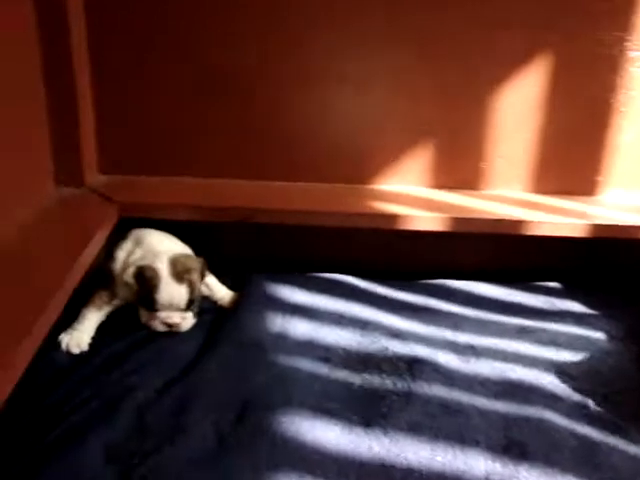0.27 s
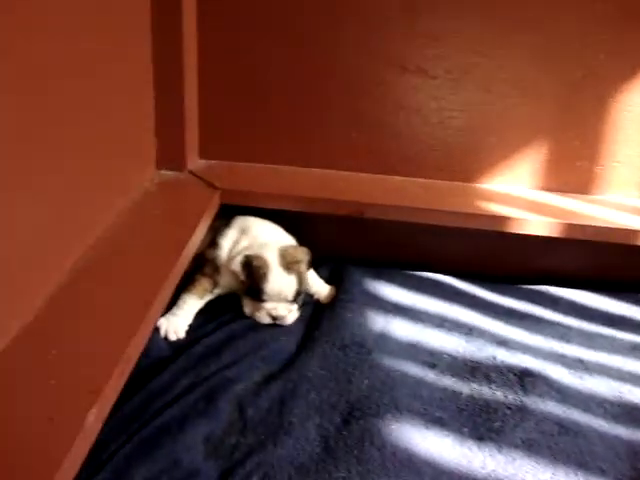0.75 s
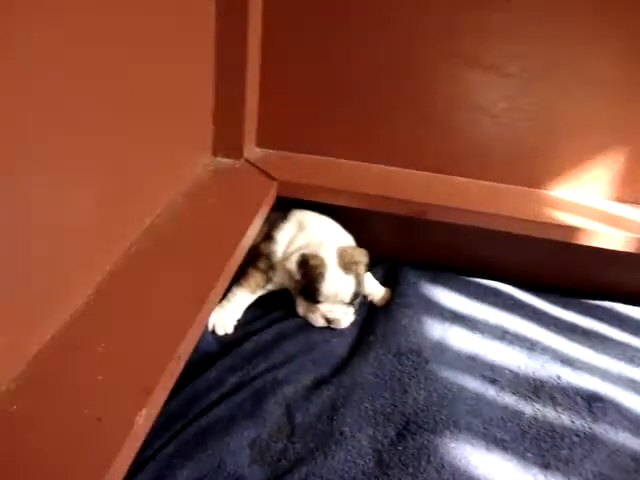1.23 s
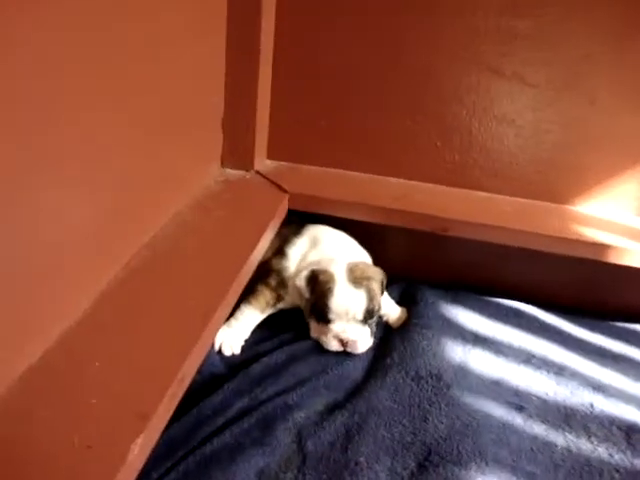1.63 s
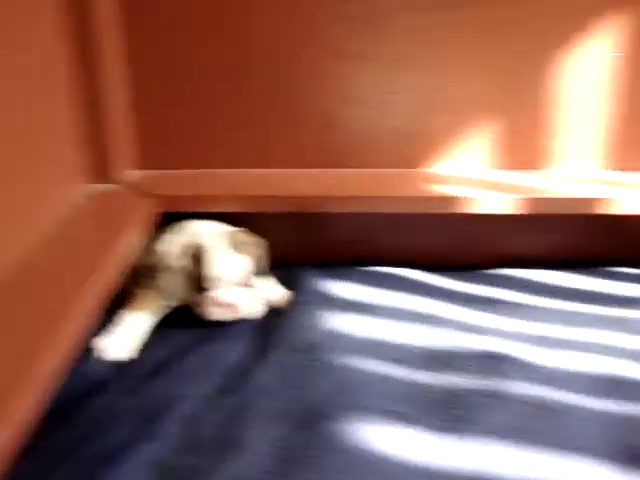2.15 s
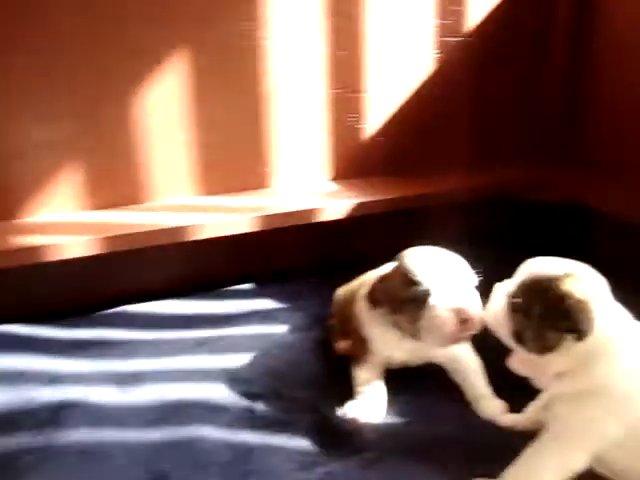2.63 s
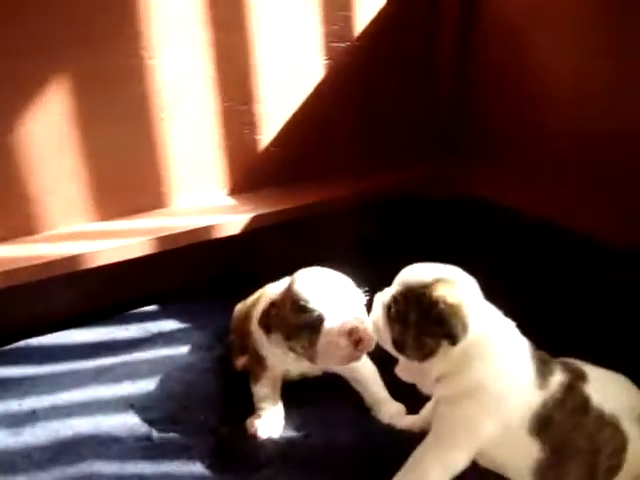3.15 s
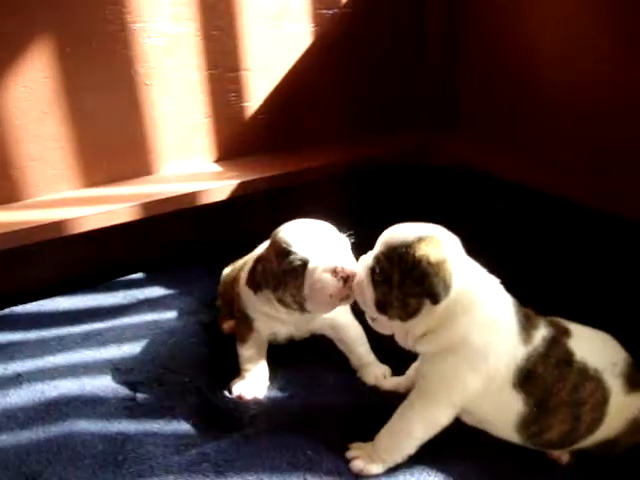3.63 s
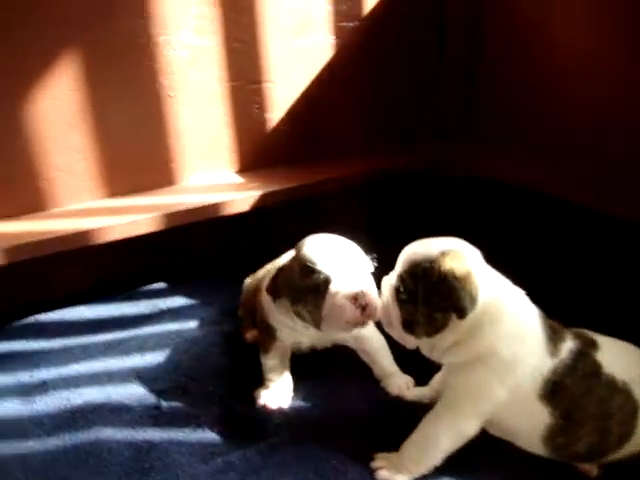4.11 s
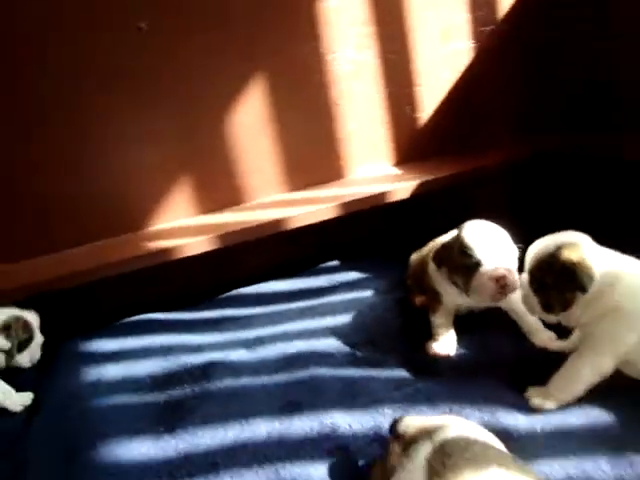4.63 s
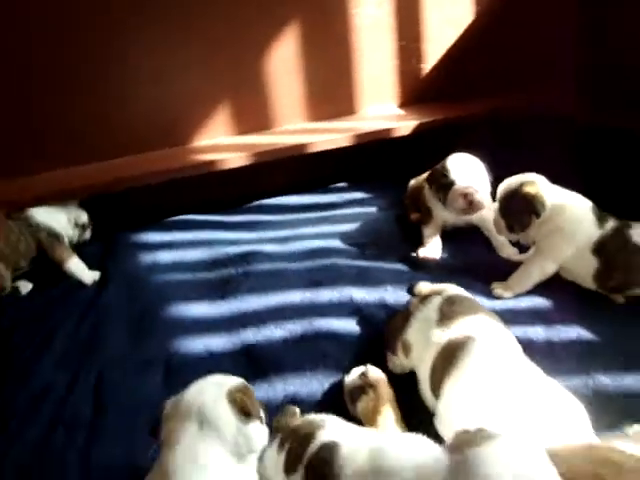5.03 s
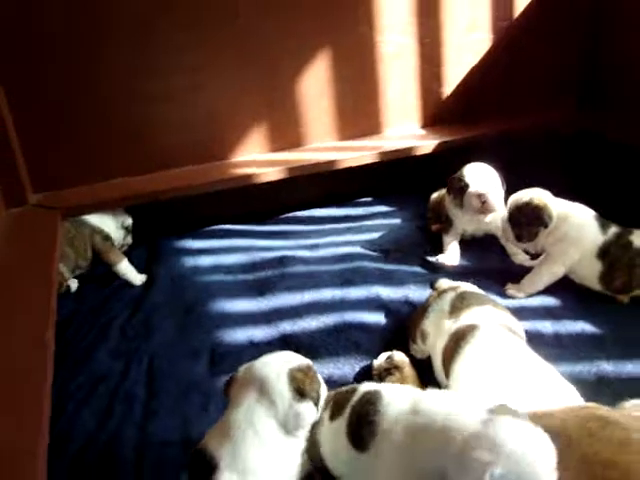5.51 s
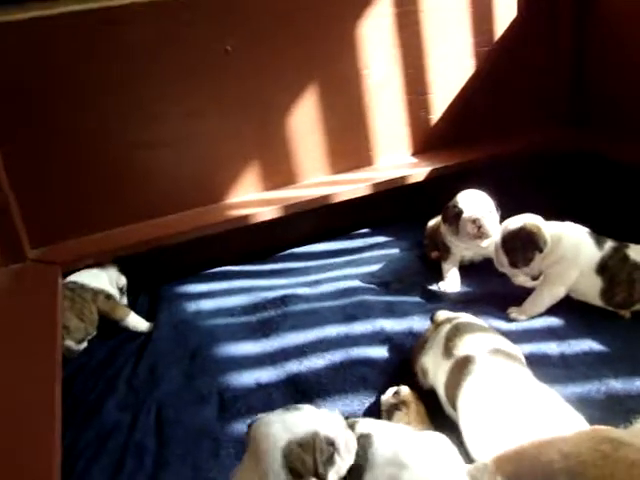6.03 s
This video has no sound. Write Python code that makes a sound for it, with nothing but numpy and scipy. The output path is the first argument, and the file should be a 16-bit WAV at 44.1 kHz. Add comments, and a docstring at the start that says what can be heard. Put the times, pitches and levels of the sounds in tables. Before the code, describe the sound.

A very young puppy gives two runs of thin, high, whistle-like squeals in a quiet wooden box, with snuffles, soft paw thumps and blanket rustles.

```python
"""A quiet room with a wooden whelping box, heard from just above: steady air noise, faint hum, hiss, rumble.
Claws scratch the boards (skidding noise grains), then a very young puppy starts a run of nearly pure cries,
sine stacks with weak overtones; the loudest breaks into a rasp, and grainy snuffles fall between cries.
After a pause paws land with soft thumps (short low sines) and a second, shorter run begins.
Ticks (damped resonances) and blanket rustles (dull grains) come throughout and outlast the cries."""
import sys
import numpy as np
from scipy import signal
from scipy.fft import rfft, next_fast_len
from scipy.io import wavfile
from scipy.ndimage import uniform_filter1d, minimum_filter1d, map_coordinates

SR = 44100
rng = np.random.default_rng(int(sys.argv[2]) if len(sys.argv) > 2 else 0)


def digitize_waveform(pressure):
    """Quantize a signal to 16-bit integers and store it at the path in sys.argv[1].

    Rows of a 2-D input are taken as channels; values are limited to [-1, 1].
    """
    field = np.atleast_2d(pressure).T
    bounded = np.clip(field, -1, 1)
    quanta = np.round(bounded * 32767).astype(np.int16)
    wavfile.write(sys.argv[1], SR, quanta)


N = 276057
TIME = np.arange(N) / SR   # [s]
CUTOFF_HZ = 10150   # top of the noises and of the recorder


def from_db(db):
    """Decibels to gain."""
    return 10 ** (np.asarray(db) / 20)


def rms_one(x):
    """Scale to unit rms."""
    return x / np.sqrt(np.mean(x ** 2) + 1e-20)


def at_hz(points, hz):
    """Read a spectrum in dB on a log-frequency axis."""
    f, db = np.transpose(points)
    return np.interp(np.log(np.maximum(hz, 1)), np.log(f), db)


def coloured(x, spectrum, tilt_db=0):
    """Give a noise a spectrum, tilted in dB per octave and empty above the cutoff; rms 1."""
    hz = np.maximum(np.fft.rfftfreq(len(x), 1 / SR), 1)
    gain = from_db(at_hz(spectrum, hz) + tilt_db * np.log2(hz)) * (hz < CUTOFF_HZ)
    return rms_one(np.fft.irfft(rfft(x) * gain, len(x)))


def drift(rate, size):
    """Smooth random wander of spread about 1, drawn through 2 * rate random knots per second."""
    knots = rng.standard_normal(size // 16 + 4)
    position = np.arange(size) * min(2 * rate / SR, 1 / 16)
    return map_coordinates(knots, [position], order=2, mode="mirror")


def grains(size, per_s, smooth):
    """Random clicks of uneven size over a share of smooth noise."""
    clicks = (rng.random(size) < per_s / SR) * rng.standard_normal(size)
    return rms_one(clicks) + smooth * rng.standard_normal(size)


def add(out, s, sound):
    """Mix a sound in at a given time."""
    at = max(int(s * SR), 0)
    out[at:at + len(sound)] += sound[:max(N - at, 0)]


def swell(size):
    """A rounded rise and fall of rms 1."""
    return np.sqrt(signal.windows.hann(size) * 2)


def grain_bursts(rows, spectrum, per_s, smooth):
    """Each row (time, length, level, optional tilt) is one swelling burst of coloured grains."""
    out = np.zeros(N)
    for s, length, db, *tilt_db in rows:
        size = int(length * SR)
        burst = coloured(grains(size, per_s, smooth), spectrum, *tilt_db)
        add(out, s, from_db(db) * swell(size) * burst)
    return out


def bed(spectrum, swells, floor_db):
    """Smooth noise over a steady floor, with swells where rows are given."""
    level = np.zeros(N)
    for s, length, db in swells:
        add(level, s, from_db(db) * swell(int(length * SR)))
    noise = coloured(rng.standard_normal(next_fast_len(N)), spectrum)[:N]
    return noise * np.hypot(level, from_db(floor_db))


def room_air():
    """Steady room noise: random air pressure with a fixed spectrum."""
    # spectrum of the room noise: (frequency [Hz], relative level [dB])
    air_colour = [(15, -55.5), (25, -20.5), (172, -8), (205, -16.5), (233, -2.5), (348, -1.5), (425, -1),
                  (458, 0), (506, -1), (795, -4), (972, -1.5), (1310, -7.5), (1420, -4.5), (1730, -7.5),
                  (10000, -19), (13000, -63), (22000, -120)]
    return bed(air_colour, [], floor_db=-53)


def household_hum():
    """Faint steady tones whose phase wavers slowly."""
    # hum tones: (frequency [Hz], level [dB rms])
    tones = [(172, -77), (234, -71.5)]
    out = np.zeros(N)
    for hz, db in tones:
        out += np.sqrt(2) * from_db(db) * np.sin(2 * np.pi * hz * TIME + drift(5.1, N))
    return out


def high_hiss():
    """A thin high noise band comes and goes over a faint floor."""
    # swells of the hiss: (time [s], length [s], level [dB])
    hiss_swells = [(0.37, 0.26, -61), (0.64, 0.54, -65), (2.611, 0.42, -54), (3.295, 0.079, -64),
                   (4.373, .11, -62), (4.76, 0.52, -54.5)]
    # spectrum of the hiss: (frequency [Hz], relative level [dB])
    hiss_colour = [(4500, -26), (6000, -10), (7200, -5), (8200, -16), (10000, -29)]
    return bed(hiss_colour, hiss_swells, floor_db=-73)


def box_rumble():
    """The box rumbles softly in a low noise band as the litter shifts."""
    # swells of the rumble: (time [s], length [s], level [dB])
    rumble_swells = [(1.463, 0.098, -63), (1.794, 0.17, -57.5), (2.201, 0.2, -55.5), (4.25, .14, -59),
                     (4.63, 0.1, -64), (5.922, 0.37, -67)]
    # spectrum of the rumble: (frequency [Hz], relative level [dB])
    rumble_colour = [(40, -32), (100, -23.5), (160, -5), (210, -4), (260, -4.5), (400, -8.5), (1000, -44)]
    return bed(rumble_colour, rumble_swells, floor_db=-67)


def reflections(x, spectrum, t60, build_s):
    """Dense reflections that build up and die away, modelled as decaying coloured noise."""
    t = TIME[:SR * 3 // 4]
    envelope = from_db(-60 * t / t60) * (1 - np.exp(-t / build_s))
    tail = coloured(rng.standard_normal(len(t)), spectrum) * envelope
    return signal.fftconvolve(x, tail / np.linalg.norm(tail))[:N]


def room(x):
    """Direct sound, quick scatter in the box, a few distinct echoes and the tail of the room."""
    # scatter inside the box: (frequency [Hz], relative level [dB])
    box_colour = [(150, -20), (2000, 3.5), (4000, 0), (6000, 4), (10000, 0.5)]
    # tail of the room: (frequency [Hz], relative level [dB])
    room_colour = [(150, 4.5), (1200, -7), (2000, -2), (3400, 2), (5000, -2.5), (7200, 2.5), (10000, -9.5)]
    # echoes off the box and the nearest walls: (delay [s], level [dB])
    echoes = [(.0047, -35.5), (0.0128, -22), (.031, -21.5), (.052, -33.5)]
    out = x + from_db(-9) * reflections(x, box_colour, t60=.08, build_s=.002)
    out += from_db(-16) * reflections(x, room_colour, t60=.56, build_s=.015)
    for delay, db in echoes:
        out += from_db(db) * np.interp(TIME - delay, TIME, x)
    return out


def dips(x):
    """The fundamental's band fades as if a cry and its echoes cancelled; the overtones carry on."""
    # brief fades: (time [s], half width [s], depth [dB])
    fades = [(1.321, 0.0039, 19), (1.352, 0.0034, 19.5), (2.13, 0.004, 16.5), (2.605, 0.0099, 10),
             (3.028, 0.015, 8), (4.589, 0.012, 16), (5.362, 0.036, 9)]
    # band that fades: low edge [Hz], high edge [Hz]
    band_hz = (1100, 2500)
    depth_db = sum(db * np.exp(-((TIME - s) / width) ** 2) for s, width, db in fades)
    band = signal.sosfiltfilt(signal.butter(2, band_hz, "band", fs=SR, output="sos"), x)
    return x - band * (1 - from_db(-depth_db))


def rustles():
    """Bodies brush the blanket: fleece fibres slip in dense, dull grains."""
    # brushes: (time [s], length [s], level [dB])
    brushes = [(0.549, .15, -58), (3.1, 0.094, -55), (4.218, 0.12, -62.5), (4.639, 0.048, -50.5),
               (4.948, 0.031, -51), (5.06, 0.16, -52), (5.568, 0.13, -57.5), (5.879, 0.076, -53)]
    # spectrum of the blanket: (frequency [Hz], relative level [dB])
    blanket_colour = [(100, -36.5), (300, -6.5), (500, 4.5), (750, -6.5), (1300, -4), (2200, -8.5),
                      (8000, -25)]
    return grain_bursts(brushes, blanket_colour, per_s=280, smooth=.4)


def thumps(rise_s=0.0028):
    """Paws land: the blanket softens each footfall to a few cycles of the floor board."""
    # footfalls: (time [s], peak level [dB], ring [Hz])
    footfalls = [(4.251, -49, 385), (4.277, -40.5, 290), (4.310, -38, 278), (4.644, -35, 248),
                 (4.656, -40, 310), (4.668, -31, 234)]
    out, t = np.zeros(N), TIME[:SR // 10]
    envelope = t / rise_s * np.exp(1 - t / rise_s)
    for s, db, hz in footfalls:
        add(out, s, from_db(db) * envelope * np.sin(2 * np.pi * hz * t))
    return out


def faint_ticks(count=7):
    """Light touches at random moments, ringing within half an octave of 1400 Hz, peaking at -40 dB."""
    return [(when * N / SR, -40, 1400 * 2 ** (colour - .5)) for when, colour in rng.random((count, 2))]


def ticks(contact_s=0.0025, sharpness=4.4):
    """Claws and lips tick: a brief, soft contact rings one heavily damped resonance."""
    # the clearest ticks: (time [s], peak level [dB], ring [Hz])
    clear_ticks = [(.565, -40, 940), (2.816, -32, 2280), (3.569, -35, 740), (4.108, -42, 1210),
                   (4.363, -37, 1250), (4.703, -33.5, 2300), (4.722, -37, 2270), (5.109, -36.5, 870),
                   (5.186, -37, 840), (5.595, -38, 1160), (5.812, -34, 1720), (5.852, -34, 1750),
                   (5.863, -36.5, 1710), (6.110, -35.5, 1400), (6.199, -38.5, 1600)]
    out, t = np.zeros(N), TIME[:SR // 12]
    for s, db, hz in clear_ticks + faint_ticks():
        contact = rng.standard_normal(len(t)) * np.exp(-t / contact_s)
        # a soft contact has little sound above its ring
        contact = signal.lfilter(*signal.butter(2, 1.4 * hz, fs=SR), contact)
        ring = signal.lfilter(*signal.iirpeak(hz, sharpness, fs=SR), contact)
        add(out, s, from_db(db) * ring / np.abs(ring).max())
    return out


def scratches():
    """A claw catches on the boards, then skids in a fading train of tiny slips."""
    # skids: (time [s], level [dB], decay by 60 dB [s], brightness [dB per octave])
    skids = [(0.162, -45, 0.07, -5), (0.697, -26, 0.075, -2.5), (0.707, -42, 0.33, 1),
             (5.894, -43, 0.16, 12)]
    # spectrum of claw on wood: (frequency [Hz], relative level [dB])
    claw_colour = [(300, -36), (800, -8.5), (1150, -19), (1550, -4.5), (2200, -13.5), (3300, 2),
                   (3800, -1.5), (4200, 4.5), (5500, -12.5), (7000, -14.5), (10000, -22.5)]
    out, t = np.zeros(N), TIME[:SR // 5]
    for s, db, t60, tilt_db in skids:
        slips = coloured(grains(len(t), per_s=1100, smooth=0.21), claw_colour, tilt_db)
        add(out, s, slips * from_db(db - 60 * t / t60) * (1 - np.exp(-t / 0.002)))
    return out


def snuffles():
    """Fluttering nose breath, mostly between the cries: grains of coloured noise."""
    # breaths: (time [s], length [s], level [dB], brightness [dB per octave])
    breaths = [(1.477, 0.065, -37, 0), (1.511, 0.048, -37.5, -1.5), (1.817, 0.013, -48.5, -5.5),
               (1.866, 0.042, -43.5, -2), (1.943, 0.023, -53.5, 2), (1.997, 0.03, -45, -3),
               (2.288, 0.053, -48.5, 4.5), (2.326, .06, -49.5, 3), (2.403, 0.023, -50.5, -4),
               (2.778, 0.036, -49, 4.5), (4.358, 0.095, -54.5, 0), (5.012, 0.0095, -36.5, 3)]
    # spectrum of the nose: (frequency [Hz], relative level [dB])
    nose_colour = [(30, -48.5), (90, -26.5), (170, -1), (550, -0.5), (1050, 8), (1450, -0.5), (2000, 0.5),
                   (2700, -4), (3600, -19), (7000, -22.5), (10000, -39)]
    return grain_bursts(breaths, nose_colour, per_s=830, smooth=.43)


def rasps():
    """The voice breaks into dense, rough grains of noise."""
    # breaks: (time [s], length [s], level [dB])
    breaks = [(0.371, 0.028, -48.5), (1.306, 0.012, -24), (1.318, 0.019, -37), (4.524, 0.016, -47),
              (4.622, 0.0099, -43)]
    # spectrum of the rasp: (frequency [Hz], relative level [dB])
    rasp_colour = [(30, -46), (200, -20.5), (1000, -11), (2000, 0), (3000, -5), (4200, -7.5), (5800, -5.5),
                   (7500, -10), (10000, -25)]
    return grain_bursts(breaks, rasp_colour, per_s=1800, smooth=1.0)


def cracks():
    """The voice cracks at the edge of a cry: a brief unsteady tone with its second harmonic."""
    # cracks: (time [s], length [s], level [dB], pitch [Hz])
    voice_cracks = [(1.275, 0.0055, -25.5, 1610), (3.614, 0.015, -35.5, 1116), (5.374, 0.019, -27, 1322)]
    out = np.zeros(N)
    for s, length, db, hz in voice_cracks:
        size = int(length * SR)
        phase = 2 * np.pi * np.cumsum(hz * (1 + 0.051 * drift(350, size))) / SR
        add(out, s, from_db(db) * swell(size) * (np.sin(phase) + 0.27 * np.sin(2 * phase)))
    return out


def cry_pitch(t, length, crest_s, start_hz, crest_hz, end_hz, catch_hz, bend, drop_hz):
    """The pitch eases to its crest, catching on the way, then sags and collapses as air runs out."""
    rise = np.clip(t / crest_s, 0, 1)
    sag = np.clip((t - crest_s) / (length - crest_s), 0, 1) ** bend
    arch = start_hz + (crest_hz - start_hz) * np.sin(np.pi / 2 * rise) + (end_hz - crest_hz) * sag
    catch = catch_hz * np.sin(np.pi * rise ** 0.648) ** 2   # power below 1: early in the rise
    return arch - catch - drop_hz * np.exp((t - length) / 0.007)


def cry(row, mouth_db=7.0, mouth_width_hz=450):
    """One squeal: a strong fundamental with weak, phase-locked overtones shaped by throat and mouth."""
    # throat colour of the higher harmonics: (frequency [Hz], relative level [dB])
    throat_colour = [(3500, -5), (4300, -2), (4700, -0.5), (5200, -6.5), (6100, 2), (6600, 1), (7500, -3.5),
                     (8300, 3), (8900, -16.5), (10000, -27)]
    # moments of a tiny click within a loud squeal, made by a phase jump: time [s]
    click_times = [1.294, 1.3313, 1.336, 1.359, 1.694]
    click_radians = 0.52
    attack_cycles, release_s = 22.6, 0.0092   # low cries take longer to start
    opening_cycles, closing_power = 25.2, 2.55
    (s, length, *contour, start_db, middle_db, end_db, second_start_db, second_end_db,
     upper_db, closing_db, hoarse_db, mouth_hz) = row
    t = TIME[:int((length + release_s / 2) * SR)]
    size, hoarse, progress = len(t), from_db(hoarse_db), t / t[-1]

    level_db = np.interp(progress, [0, .5, 1], [start_db, middle_db, end_db])
    level_db = level_db - 0.07 * drift(24, size)   # slight throb
    second_db = np.interp(progress, [0, 1], [second_start_db, second_end_db]) + 1.83 * drift(29.3, size)

    # the vocal folds never repeat exactly: jitter smears the high overtones most
    jitter = .125 * drift(480, size)
    flutter = 0.067 * drift(64, size)
    pitch = cry_pitch(t, length, *contour) * (1 + hoarse * (jitter + flutter))
    phase = 2 * np.pi * np.cumsum(pitch) / SR + click_radians * np.searchsorted(click_times, s + t)

    overtone_hz = np.arange(3, 9)[:, None] * pitch
    mouth_peak_db = mouth_db / (1 + ((overtone_hz - mouth_hz) / mouth_width_hz) ** 2)
    throat = from_db(at_hz(throat_colour, overtone_hz) + mouth_peak_db)
    # the mouth opens just after the voice starts and closes late, dulling the cry
    opening = 1 - np.exp(-(t * pitch[0] / opening_cycles) ** 2)
    opening = opening * from_db(-closing_db * progress ** closing_power)
    upper = from_db(upper_db) * opening * throat / np.linalg.norm(throat, axis=0)

    voice = from_db(level_db) * np.sin(phase) + from_db(second_db) * np.sin(2 * phase)
    for k, gain in enumerate(upper, start=3):
        # each high overtone holds, drops out briefly and returns; a smaller offset breaks it up more
        flicker = 1.405 * np.tanh(0.99 + drift(30, size))
        voice += gain * flicker * np.sin(k * phase)
    shimmer = 1 + hoarse * (1.3 * drift(65, size) + .6 * drift(450, size))
    edges = np.minimum(t * pitch[0] / attack_cycles, (t[-1] - t) / release_s)
    gate = np.sin(np.pi / 2 * np.clip(edges, 0, 1)) ** 2
    return s, np.sqrt(2) * gate * shimmer * voice


def puppy():
    """The main voice: cries with their cracks and rasps, and the snuffles."""
    # one cry a row: (time [s], length [s],
    #   pitch: time to crest [s], start [Hz], crest [Hz], end [Hz], catch on the way up [Hz],
    #     bend of the sag [power: under 1 early, over 1 late], final drop [Hz],
    #   fundamental: start [dB], middle [dB], end [dB], second harmonic: start [dB], end [dB],
    #   higher harmonics [dB], loss as the mouth closes [dB], hoarseness [dB], mouth resonance [Hz])
    cries = [(.328, 0.054, 0.031, 1360, 1412, 1290, 4, 2.3, 180, -42, -46.5, -44, -36, -53, -61, 3, -21, 6200),
             (.978, 0.088, 0.013, 2140, 2196, 2054, -3, 0.61, 67, -20.5, -23.5, -32, -47, -56.5, -53.5, 9, -25, 6400),
             (1.278, 0.15, .088, 1997, 2080, 1944, 95.5, 1.71, 48, -10, -12, -20.5, -38.5, -40, -33.5, 22, -18, 6100),
             (1.642, 0.15, .068, 1830, 1934, 1749, 159, 0.575, 14, -19.5, -9.5, -22.5, -54, -33.5, -39.5, 12, -24, 7500),
             (2.029, .224, .046, 1683, 1906, 1786, -2, 0.79, 127, -18.5, -28.5, -21.5, -37.5, -42.5, -45.5, 12, -23, 6440),
             (2.48, 0.21, 0.047, 1715, 1847, 1653, -2.5, 1.3, 185, -25, -24, -39, -50.5, -42, -52, 1.5, -25.5, 6850),
             (2.936, 0.17, 0.021, 1635, 1650, 1358, -3, 0.75, 118, -39.5, -28, -32.5, -44.5, -44, -39.5, 7.6, -20, 7800),
             (3.577, .055, 0.035, 1204, 1311, 1113, -2, 1.37, 143, -34.5, -32, -41, -43, -43.5, -56, 8, -31, 6900),
             (4.504, 0.12, .11, 1882, 1838, 1820, 181, 0.97, 120, -30, -19, -24, -44.5, -45.5, -39, 27, -24, 6550),
             (4.864, .182, 0.072, 1635, 1537, 1418, 33.5, 0.81, 39, -23, -24.5, -32, -39.5, -48, -31, 22.7, -24, 7800),
             (5.266, .137, 0.0995, 1502, 1419, 1360, 41.5, 1.3, 23, -42, -22.5, -32.5, -43, -46.5, -39, 19, -22.5, 5740)]
    out = cracks() + rasps() + snuffles()
    for row in cries:
        add(out, *cry(row))
    return out


def scene():
    """The litter in its box, heard from just above, over the sounds of the quiet room."""
    background = room_air() + household_hum() + high_hiss() + box_rumble()
    litter = rustles() + thumps() + ticks() + scratches() + puppy()
    # the microphone loses the litter's deepest bass, below 70 Hz
    litter = signal.lfilter(*signal.butter(2, 70, "high", fs=SR), litter)
    return (dips(room(litter)) + background)[None]


def record(dry):
    """A fast limiter holds peaks near 0.48 of full scale; the top is cut steeply."""
    gain = np.minimum(1, .48 / (np.abs(dry[0]) + 1e-9))
    gain = uniform_filter1d(minimum_filter1d(gain, size=180), size=180)   # about 4 ms
    return signal.sosfilt(signal.ellip(12, .1, 80, CUTOFF_HZ, fs=SR, output="sos"), dry * gain)


dry = scene()
out = record(dry)
digitize_waveform(out)
```